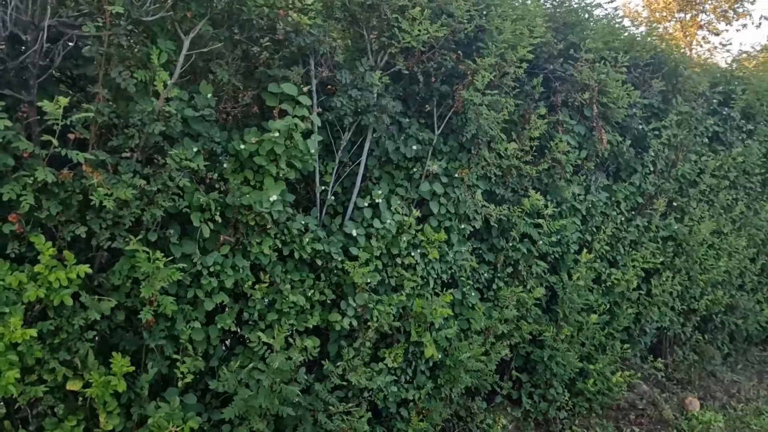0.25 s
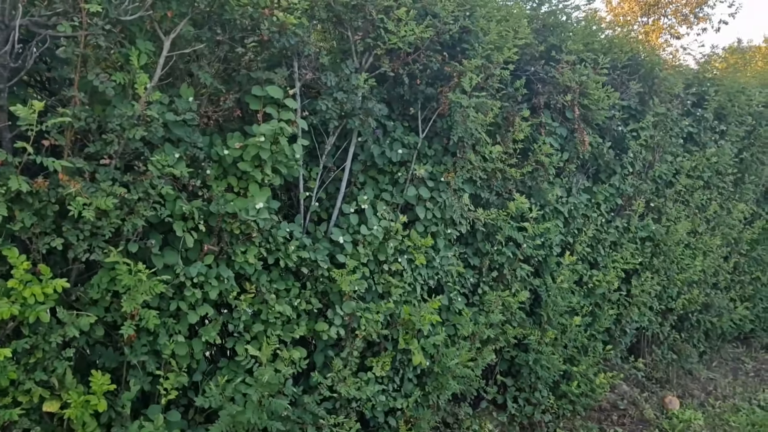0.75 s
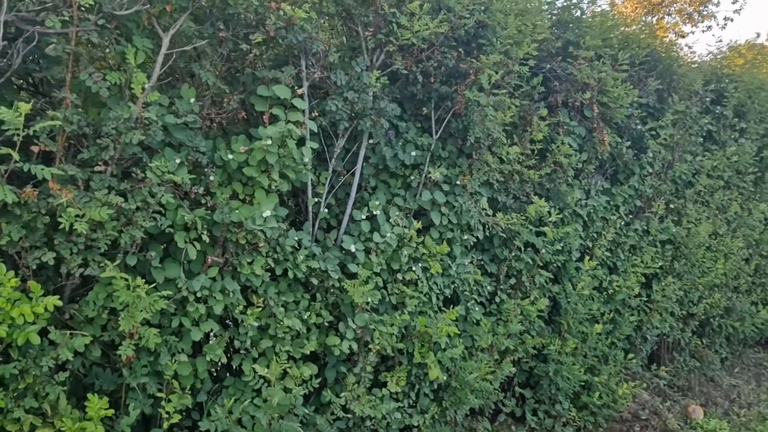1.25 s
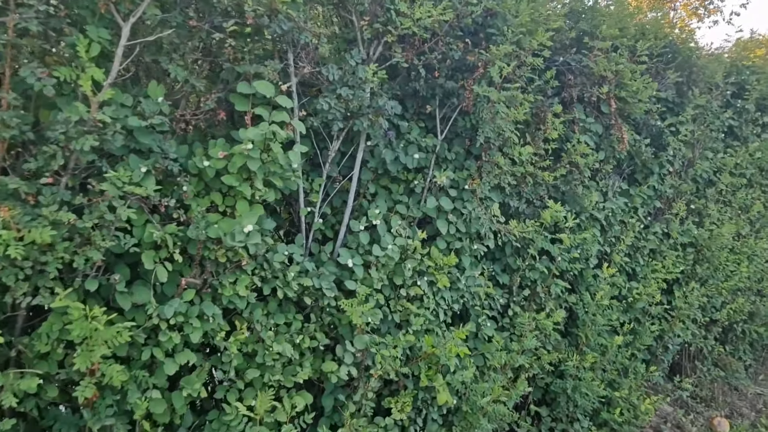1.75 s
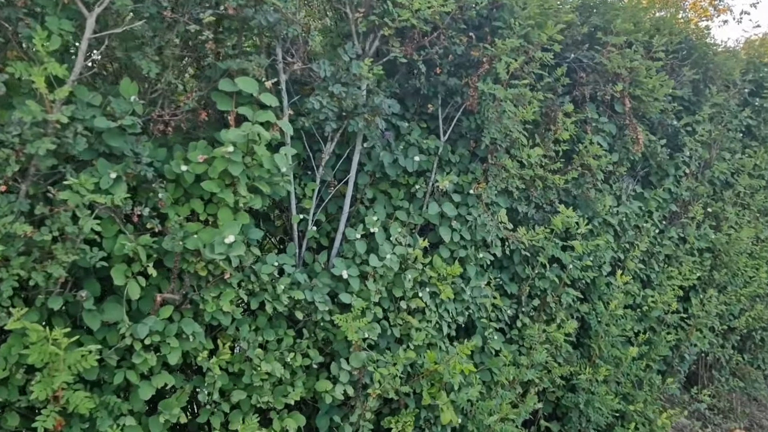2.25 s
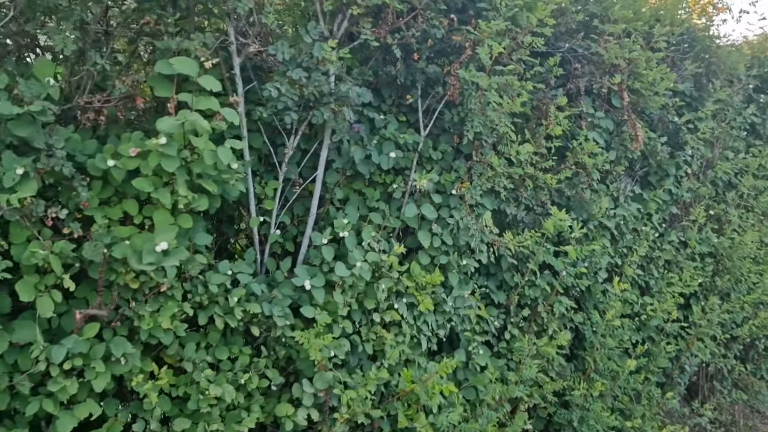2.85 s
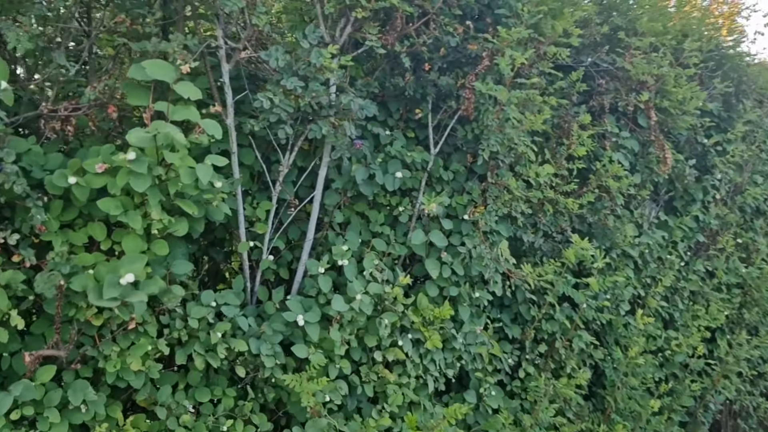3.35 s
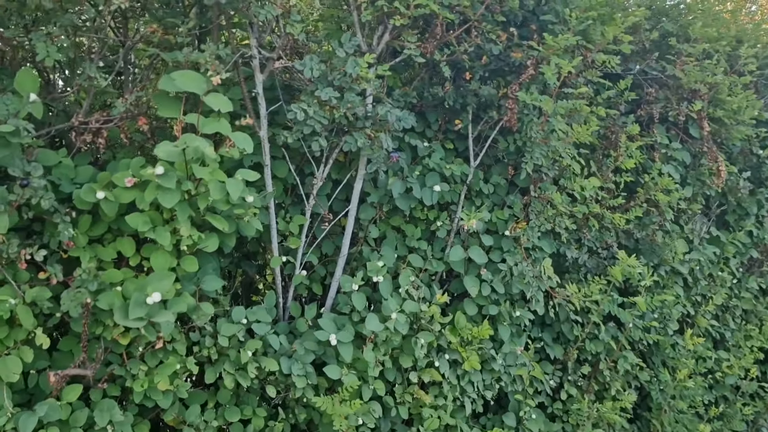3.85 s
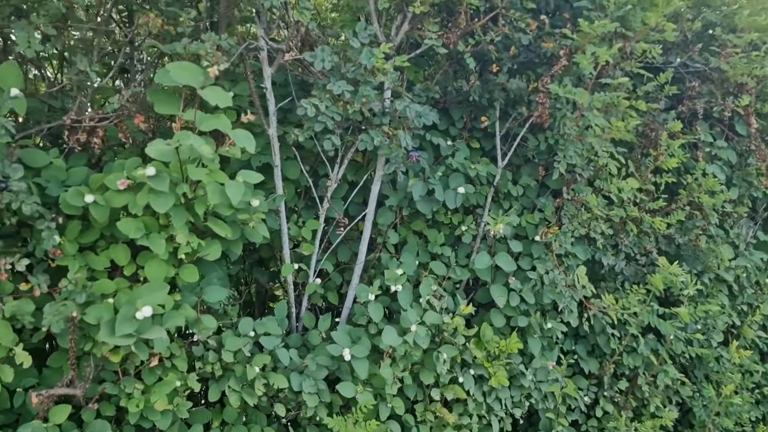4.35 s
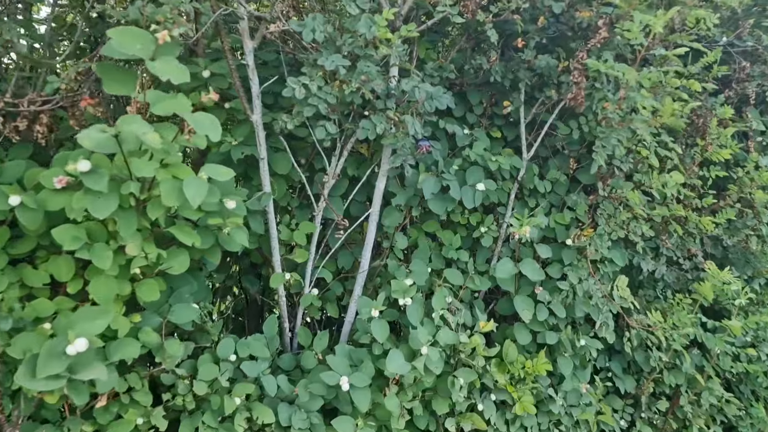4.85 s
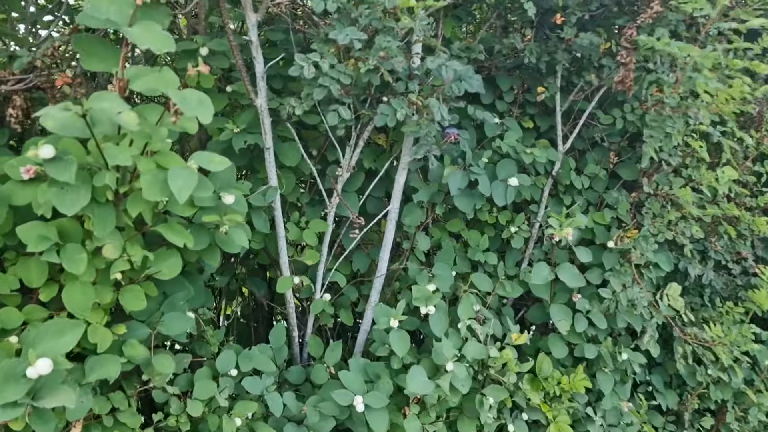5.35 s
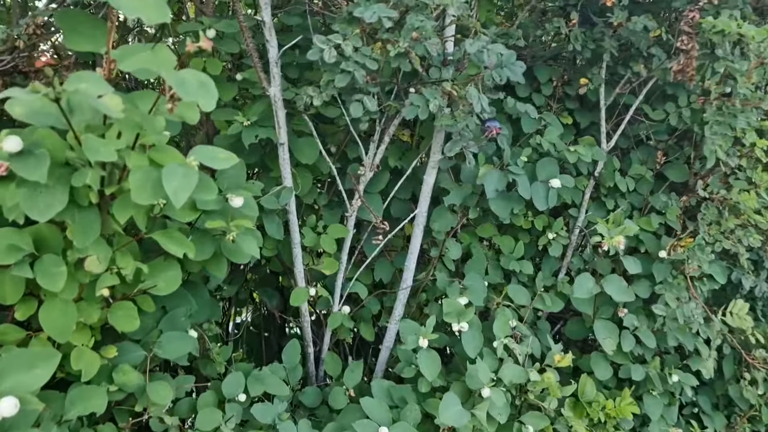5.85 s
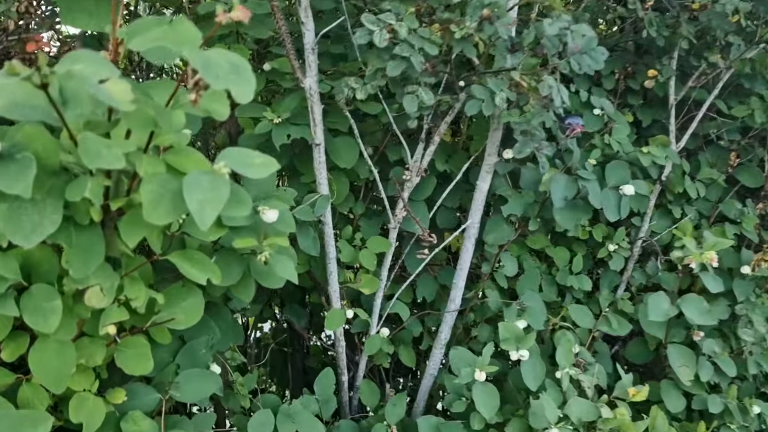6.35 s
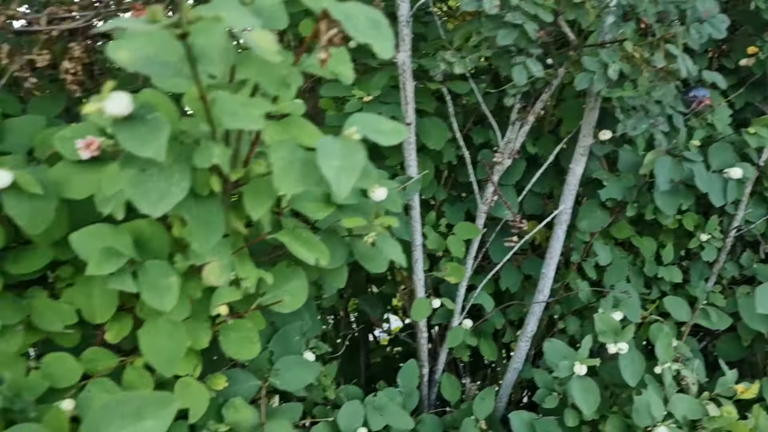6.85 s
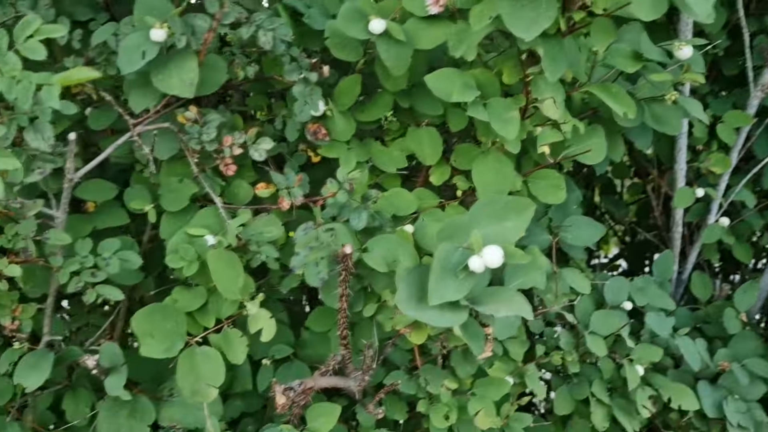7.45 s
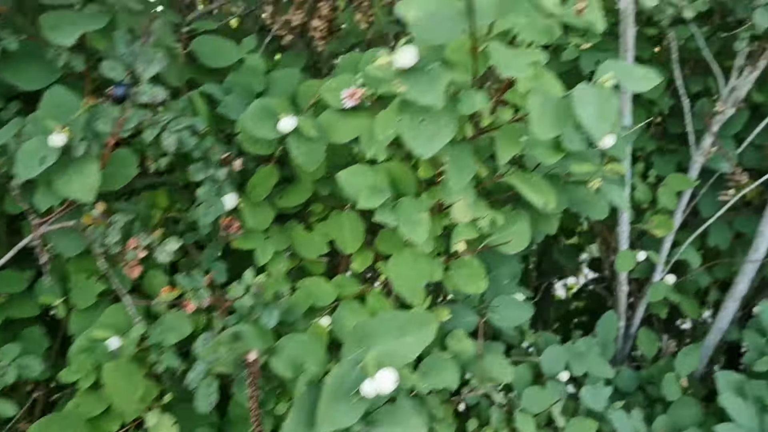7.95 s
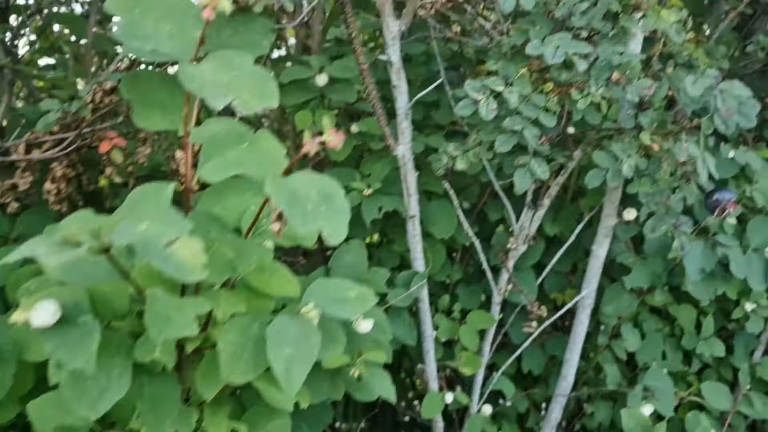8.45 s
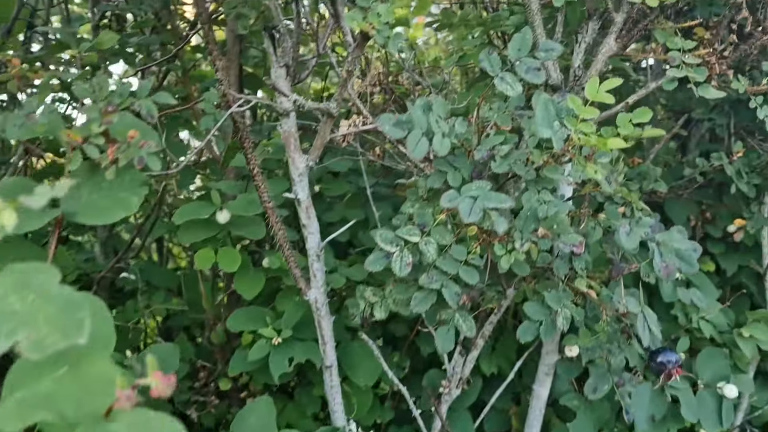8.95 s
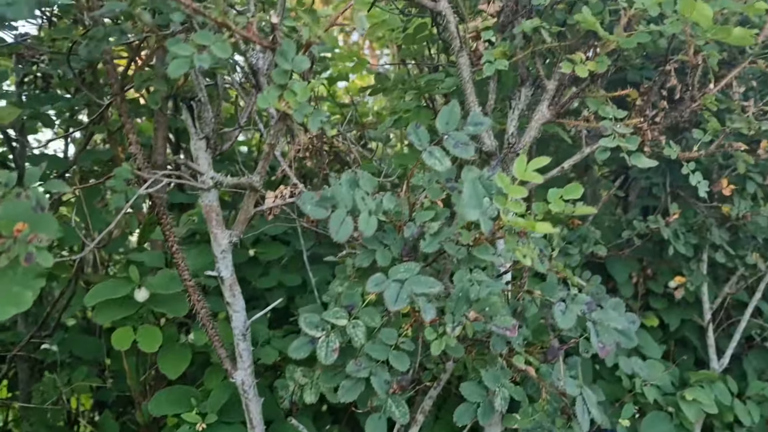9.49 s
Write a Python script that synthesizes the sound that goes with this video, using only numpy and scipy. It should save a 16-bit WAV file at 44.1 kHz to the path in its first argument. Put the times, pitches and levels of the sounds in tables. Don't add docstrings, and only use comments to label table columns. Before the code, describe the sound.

A steady buzzing insect trill close by pauses briefly as a second one joins from the left, with small twig snaps and far road hum.

```python
import sys
import numpy as np
from scipy import signal
from scipy.fft import rfft, irfft, next_fast_len
from scipy.io import wavfile
from scipy.ndimage import uniform_filter1d, map_coordinates

SR = 44100
rng = np.random.default_rng(int(sys.argv[2]) if len(sys.argv) > 2 else 0)


def persist_wave(psi):
    counts = np.round(np.clip(psi, -1, 1) * 32767).astype(np.int16)
    wavfile.write(sys.argv[1], SR, np.atleast_2d(counts).T)


def voltage_ratio(level):
    return 10 ** (np.asarray(level, float) / 20)


N = 428631

# time in seconds, lead on the steady beat
# in strokes, ring level in dB, how far the wing faces the camera in dB, lag of the left side in ms.
NEAR_SONGS = [
    [(0.0, -0.094, -29.5, 0, -0.045), (1.0, -0.53, -29, 1.5, -0.056), (1.45, -0.57, -30.5, -0.5, -0.019),
     (2.0, -0.5, -30.5, -1, -0.015), (2.8, -0.67, -27, 5, -0.058), (3.15, -0.53, -28, 4.5, -0.056),
     (3.65, -0.47, -27.5, -1, -0.018), (4.4, -0.42, -28.5, 3, -0.0064), (4.9, -0.21, -26, -2, -0.0043),
     (5.5, -0.22, -27.5, 5, 0.019), (6.28, -0.35, -27, 8, 0.033)],
    [(7.15, -0.072, -32, -3, -0.038), (7.58, -0.36, -32.5, 7, -0.041), (8.2, -0.56, -27, 0.5, -0.036),
     (8.85, -0.85, -27, 0, -0.057), (9.1, -0.9, -24, -0.5, -0.08), (9.3, -0.93, -24, 4, -0.098),
     (9.72, -0.77, -23.5, -1.5, -0.118)],
]
FAR_SONGS = [
    [(5.85, 0.36, -57, 0.01, 0), (6.2, 0.33, -41.5, 0, 0), (6.9, 0.41, -34.5, 0, 0),
     (7.26, 0.47, -35, 0.017, 0), (7.96, 0.46, -37.5, 0.005, 0), (8.4, 0.41, -33.5, 0.0041, 0),
     (9.3, 0.23, -40.5, 0, 0.0089), (9.72, 0.13, -34, 0.025, 0.01)],
]

# frequency in Hz, left level in dB, right level in dB.
NEAR_WING_COLOUR = [(3800, -44, -44), (6500, -18, -17), (7250, -1, 1), (8400, -1, -6), (9200, -9, -9),
                    (10200, -20, -17), (12500, -24, -25), (15200, -14, -18)]
FAR_WING_COLOUR = [(4000, -56, -56), (6600, -33, -34), (7300, -12, -15), (8700, 2, -11), (9900, -14, -13),
                   (11000, -11, -14), (13200, -27, -36), (15300, -23, -31)]

# place in the stroke from -0.5 to 0.5, tooth size in dB,
# teeth per second.
WING_STROKE = [(-.5, -22.5, 600), (-.36, -18, 700), (-.23, -13.5, 1100), (-.12, 0.5, 380), (.0, 3, 300),
               (.1, 2, 420), (0.169, -0.5, 320), (.29, -10.5, 414), (.5, -18, 790)]

# frequency in Hz, level in dB per Hz.
RUMBLE_COLOUR = [(12, -72), (20, -22), (43, -3.5), (92, 1), (117, -1.5), (140, -12), (200, -17),
                 (260, -36.5), (440, -120)]
ROAR_COLOUR = [(76, -18), (130, -6), (253, -7.5), (285, -6.5), (452, -11), (782, -10), (1040, -21),
               (1480, -15.5), (1550, -21.5), (1670, -21), (2600, -35), (3820, -39), (4500, -27.5),
               (5850, -46), (9900, -120)]
RUSTLE_COLOUR = [(500, -34), (1000, -7), (1600, 2.5), (3000, -9), (5200, -13), (8000, -40)]

# frequency in Hz, left-right likeness from 0 to 1.
LEFT_RIGHT_LIKENESS = [(60, .998), (180, 1), (350, 0.75), (700, 0.25), (1500, 0.057), (3000, 0.45)]

# time in seconds, level in dB.
ROAR_LEVEL = [(0, -46.5), (1.5, -47.5), (2.2, -48.5), (3.8, -49), (4.5, -48), (6.2, -46.5), (7.0, -45.5),
              (8.0, -45), (8.4, -47), (9.0, -45.5), (9.72, -49)]

# start in seconds, end in seconds, pitch in Hz, level in dB.
ENGINE_AND_TYRE_TONES = [(-.2, 2.0, 56, -39), (4.8, 8.1, 57, -41), (9.25, 9.7, 56, -39),
                         (0.2, 1.1, 90, -41), (1.45, 2.6, 88, -42), (3.6, 4.2, 88, -41),
                         (6.0, 7.0, 89, -40), (7.6, 8.1, 88, -39), (8.4, 8.7, 86, -41), (9.3, 9.8, 90, -39),
                         (0.6, 1.2, 597, -64), (4.0, 5.3, 597, -64), (7.5, 8.1, 597, -63),
                         (-.2, 0.7, 720, -63), (4.3, 5.2, 720, -65), (6.25, 6.95, 1416, -64),
                         (6.95, 7.6, 1407, -68), (9.4, 9.9, 1410, -67), (0.8, 1.8, 1570, -71),
                         (2.9, 3.6, 1570, -71), (6.8, 7.45, 1572, -65), (7.35, 8.08, 1556, -59),
                         (8.7, 9.6, 1578, -70)]

# middle in seconds, half length in seconds, level in dB.
GRASS_SWISHES = [(0.375, 0.053, -56.5), (1.285, 0.093, -55), (1.616, 0.2, -59.5), (2.572, 0.051, -52.5),
                 (2.698, 0.07, -51), (3.257, 0.059, -58), (3.499, 0.09, -58), (4.253, 0.056, -51.5),
                 (4.563, 0.18, -58), (5.07, 0.15, -56), (5.947, 0.075, -57), (6.145, 0.077, -59),
                 (9.001, 0.16, -61)]

# time in seconds, peak in dB, left over right in dB, pitch in Hz.
TWIG_TICKS = [(0.3681, -45, 24, 1990), (0.6185, -37, 11, 1370), (1.2347, -37, 6, 1380),
              (1.277, -34, 7, 1796), (1.4471, -41, 8, 1430), (1.6968, -28.5, 8, 1772),
              (2.4983, -47, 2.5, 1339), (2.699, -41, 4.5, 1509), (4.2487, -30, 6, 960),
              (4.4203, -1.5, 4, 1400), (4.943, -49, 3.0, 1798), (5.036, -46, 3.0, 1780),
              (5.3032, -32, -14, 3030), (5.3124, -27, 16, 2614), (5.5732, -36, 9, 1500),
              (6.111, -32, 5, 1900), (6.1964, -37, 13, 1807), (6.6138, -35, 15, 2420)]

NEAR_STROKES_PER_S, FAR_STROKES_PER_S = 19.4, 21.4
FIZZ_AT_DB = -28
CHORUS_DB = -52
RUMBLE_DB, RUMBLE_SWAY_DB, RUMBLE_SWAYS_PER_S = -38.5, -0.4, 3
ROAD_LEAD_SAMPLES = 12
TONE_SWELL_S = 0.12
WHINE_LEFT_DB, WHINE_LEFT_HZ = 7, 1000
KNOCK_RISE_CYCLES = 0.66
CAMERA_TOP_HZ = 15800


def unit(x):
    return x / np.sqrt(np.mean(x ** 2) + 1e-20)


def along(points, hz):
    f, *columns = np.transpose(points)
    return np.array([np.interp(np.log(hz + 1), np.log(f + 1), c) for c in columns])


def curves(rows):
    s, *columns = np.transpose(rows)
    return [np.interp(np.arange(N) / SR, s, c) for c in columns]


def wobble(rate):
    knots = rng.standard_normal(int(N * rate / SR) + 4)
    return map_coordinates(knots, [np.arange(N) * rate / SR])


def coloured(x, gain):
    m = 2 * next_fast_len(N // 2 + 4096)
    cepstrum = irfft(np.log(gain(np.fft.rfftfreq(m, 1 / SR)) + 1e-6), m)
    cepstrum[..., 1:m // 2] *= 2
    cepstrum[..., m // 2 + 1:] = 0
    return irfft(rfft(x, m) * np.exp(rfft(cepstrum)), m)[..., :N]


def above(x, edge_hz):
    m = next_fast_len(N)
    hz = np.fft.rfftfreq(m, 1 / SR)
    return irfft(rfft(x, m) / (1 + (edge_hz / (hz + 1)) ** 24), m)[..., :N]


def clicks(s, size):
    at = np.ravel(s)[:, None] * SR
    near = np.floor(at) + np.arange(-7, 9)
    shape = np.sinc(near - at) * np.cos(np.pi * (near - at) / 16) ** 2
    where = np.clip(near, 0, N).astype(int).ravel()
    return np.bincount(where, (np.ravel(size)[:, None] * shape).ravel(), N + 1)[:N]


def rush(spectrum, patchy_db):
    z = signal.stft(rng.standard_normal((2, N)), nperseg=512)[2]
    patches = rng.standard_normal(z.shape[1:])
    patches = uniform_filter1d(uniform_filter1d(patches, 6, 0), 14, 1)
    pair = signal.istft(z * voltage_ratio(patchy_db * unit(patches)), nperseg=512)[1][:, :N]

    def middle_and_side(hz):
        turn = np.arccos(np.clip(along(LEFT_RIGHT_LIKENESS, hz)[0], 0, .999)) / 2
        return voltage_ratio(along(spectrum, hz)) * [np.cos(turn), np.sin(turn)]

    mid, side = coloured(pair, middle_and_side)
    return unit(np.array([mid + side, mid - side]))


def glances(rows, reach_s, db):
    detour = reach_s * rng.random((rows.max() + 1, 8)) ** 1.5
    size = rng.standard_normal(detour.shape) * voltage_ratio(db - 7 * detour / reach_s)
    return detour[rows], size[rows]


def ring_share(hz):
    return 1 / (1 + (hz / 9800) ** 14) / (1 + (6000 / (hz + 1)) ** 20)


def cricket(songs, beat, wing, fizz_db, fizz_lags, leaves_db, loose_db, jitter_ms, fizz_depth):
    t = np.arange(N) / SR
    lead, ring_db, facing_db, lag_ms = curves(np.vstack(songs))
    stroke, part = np.divmod(beat * t + lead + .5, 1)
    count = (stroke - stroke.min()).astype(int)
    middle = t + (.5 - part) / beat
    singing = sum((middle > song[0][0]) & (middle < song[-1][0]) for song in songs) > 0

    parts, sizes_db, rates = np.transpose(WING_STROKE)
    teeth = np.cumsum(np.interp(part - .5, parts, rates)) / SR
    i = np.flatnonzero(np.diff(np.floor(teeth)) * singing[1:])
    chance = rng.standard_normal((len(i), 2))
    strike_s = np.interp(np.floor(teeth[i]) + 1, teeth, t) + jitter_ms / 1000 * chance[:, 0]
    strike_db = np.interp(part[i] - .5, parts, sizes_db) + 1.5 * chance[:, 1]

    which = count[i]
    each = np.arange(len(i))
    shared = [glances(which, .0017, -4), glances(which, .007, -9)]
    layers = np.zeros((2, 2, N))
    for ear in range(2):
        heard = (strike_s + (.5 - ear) * lag_ms[i] / 1000)[:, None]
        for layer, depth, early in ((0, 1, 0), (1, fizz_depth, .003)):
            size = (singing[i] * voltage_ratio(depth * strike_db))[:, None]
            if layer == 0:
                layers[layer, ear] += clicks(heard, size)
            leaves = glances(which, .009, leaves_db)
            loose = glances(each, .0044, loose_db)
            for delay, gain in (shared[layer], leaves, loose):
                layers[layer, ear] += clicks(heard + delay - early, size * gain)
    ring = coloured(layers[0], lambda hz: voltage_ratio(along(wing, hz)) * ring_share(hz))
    fizz = coloured(layers[1], lambda hz: voltage_ratio(along(wing, hz)) * (1 - ring_share(hz)))

    whole = np.bincount(count, singing) > .7 * SR / beat

    def stroke_mean(x):
        return (np.bincount(count, x) / np.bincount(count))[whole]

    def even(x, both):
        effort = np.sqrt(stroke_mean(np.mean(x ** 2, 0)))
        return x / np.interp(t, stroke_mean(t), effort) * np.std(x) / np.std(both)

    upper, top = above(ring, 8620), above(fizz, 7920)
    ring = even(ring - upper, ring) + voltage_ratio(facing_db) * even(upper, ring)
    fizz = even(fizz - top, fizz) + even(top, fizz)
    fizz_gain = voltage_ratio(fizz_db - fizz_lags * (ring_db - FIZZ_AT_DB))
    return voltage_ratio(ring_db + 3.0) * (ring + fizz_gain * fizz)


def near_cricket():
    return cricket(NEAR_SONGS, NEAR_STROKES_PER_S, NEAR_WING_COLOUR, fizz_db=-9.5, fizz_lags=.17,
                   leaves_db=-10, loose_db=-9, jitter_ms=.03, fizz_depth=.72)


def chorus():
    noise = rng.standard_normal((2, N))
    hiss = coloured(noise, lambda hz: voltage_ratio(along(FAR_WING_COLOUR, hz)[1]))
    return voltage_ratio(CHORUS_DB + wobble(1.9)) * unit(hiss)


def traffic():
    roar_db, = curves(ROAR_LEVEL)
    rumble_db = RUMBLE_DB + RUMBLE_SWAY_DB * wobble(RUMBLE_SWAYS_PER_S)
    road = voltage_ratio(rumble_db) * rush(RUMBLE_COLOUR, patchy_db=1.0)
    road += voltage_ratio(roar_db) * rush(ROAR_COLOUR, patchy_db=1.5)
    road[1] = np.roll(road[1], ROAD_LEAD_SAMPLES)
    t = np.arange(N) / SR
    sway_db, waver = 1.32 * wobble(10), 1.05 * wobble(5)
    for k, (start, end, hz, db) in enumerate(ENGINE_AND_TYRE_TONES):
        first = max(round((start - 2 * TONE_SWELL_S) * SR), 0)
        i = slice(first, round((end + 2 * TONE_SWELL_S) * SR))
        inside = np.minimum(t[i] - start, end - t[i])
        swell = np.clip(inside / TONE_SWELL_S / 2 + .5, 0, 1) ** 2
        own = k * N // len(ENGINE_AND_TYRE_TONES)
        pan_db = WHINE_LEFT_DB * (hz > WHINE_LEFT_HZ) * np.array([[.5], [-.5]])
        level = voltage_ratio(db + 3.0 + pan_db + np.roll(sway_db, own)[i])
        road[:, i] += swell * level * np.sin(2 * np.pi * hz * t[i] + np.roll(waver, own)[i])
    return road


def grass():
    t = np.arange(N) / SR
    grains = voltage_ratio(1.8 * wobble(150) + 2.4 * wobble(24.7))
    brushing = sum(voltage_ratio(db) * np.exp(-((t - s) / half) ** 4) for s, half, db in GRASS_SWISHES)
    return brushing * unit(grains * rush(RUSTLE_COLOUR, patchy_db=-2.5)) * [[1.2], [.8]]


def twigs():
    out, t = np.zeros((2, N + SR)), np.arange(SR // 20) / SR
    for s, db, pan_db, hz in TWIG_TICKS:
        rise = np.sin(np.pi / 2 * np.minimum(t * hz / KNOCK_RISE_CYCLES, 1)) ** 2
        knock = voltage_ratio(-60 * t * hz / 7) * np.sin(2 * np.pi * hz * t) * rise
        resonance = [1, -1.8 * np.cos(2 * np.pi * hz / SR), .81]
        noise = signal.lfilter([1, 0, -1], resonance, rng.standard_normal((2, len(t)))) / 4
        scatter = voltage_ratio(-25.5 - 60 * t / 0.027) * noise
        level = voltage_ratio(db + 2.0 + pan_db * np.array([[.5], [-.5]]))
        out[:, round(s * SR):][:, :len(t)] += level * (knock + scatter)
    return out[:, :N]


def far_cricket():
    return cricket(FAR_SONGS, FAR_STROKES_PER_S, FAR_WING_COLOUR, fizz_db=-7.5, fizz_lags=.62,
                   leaves_db=-9, loose_db=-9, jitter_ms=.08, fizz_depth=.75)


def scene():
    return near_cricket() + chorus() + traffic() + grass() + twigs() + far_cricket()


def low_pass(x):
    return signal.sosfilt(signal.butter(12, 17060, fs=SR, output="sos"), x)


def record(dry):
    m = next_fast_len(N)
    in_band = np.fft.rfftfreq(m, 1 / SR) < CAMERA_TOP_HZ
    kept = irfft(rfft(dry, m) * in_band, m)[:, :N]
    return low_pass(kept)


dry = scene()
out = record(dry)
persist_wave(out)
```